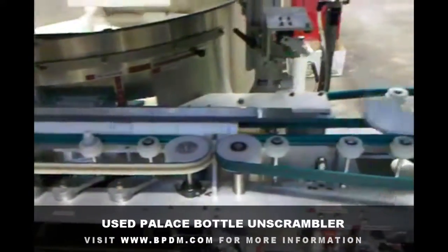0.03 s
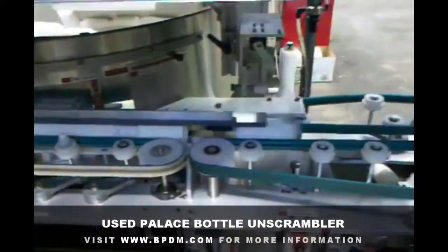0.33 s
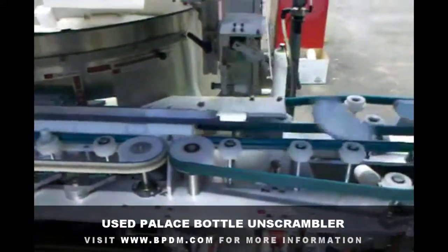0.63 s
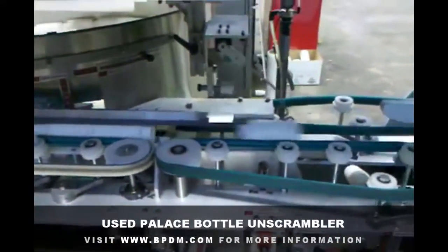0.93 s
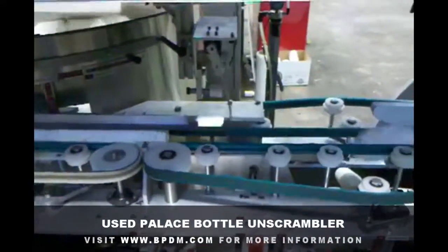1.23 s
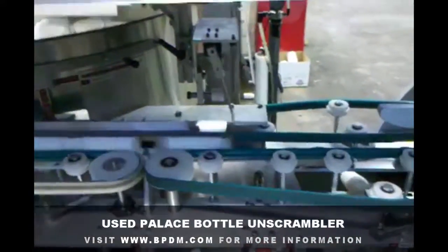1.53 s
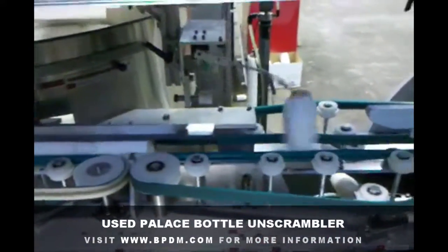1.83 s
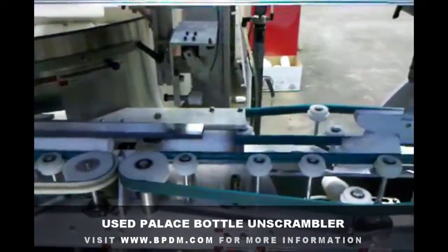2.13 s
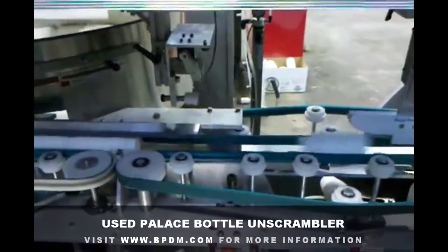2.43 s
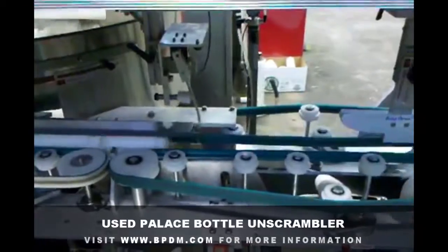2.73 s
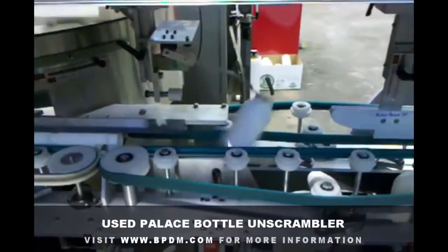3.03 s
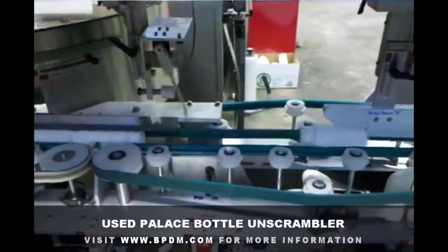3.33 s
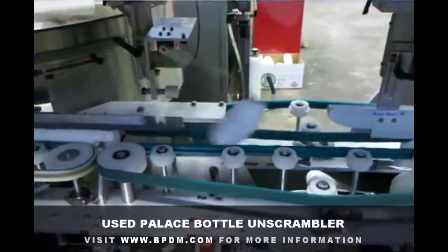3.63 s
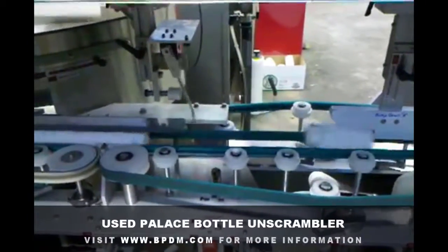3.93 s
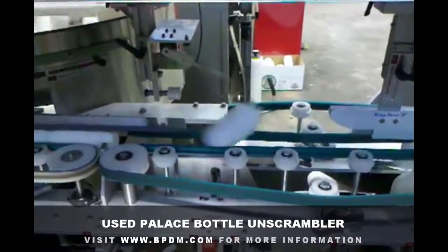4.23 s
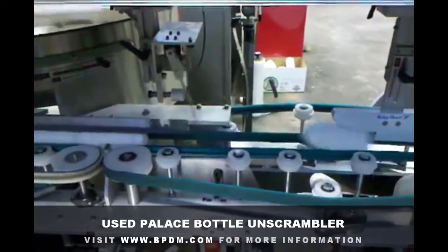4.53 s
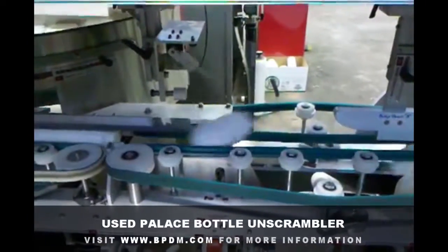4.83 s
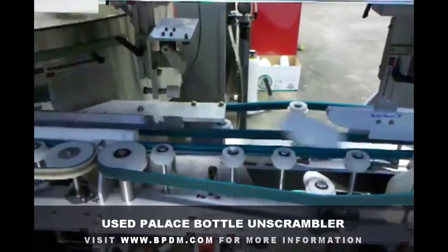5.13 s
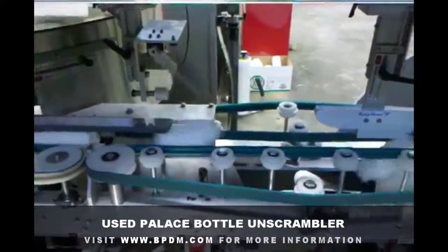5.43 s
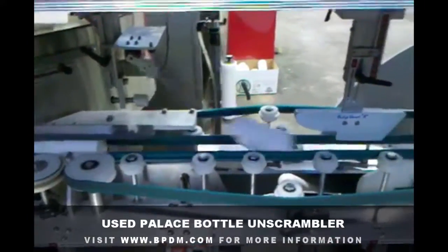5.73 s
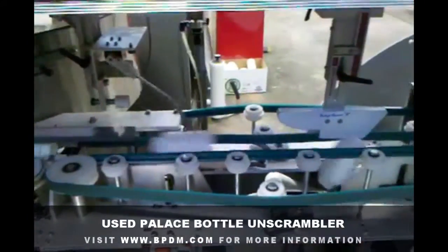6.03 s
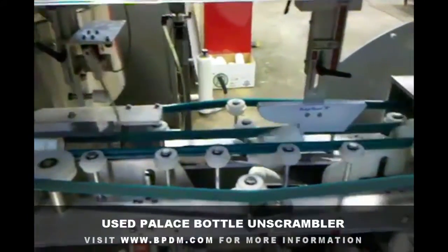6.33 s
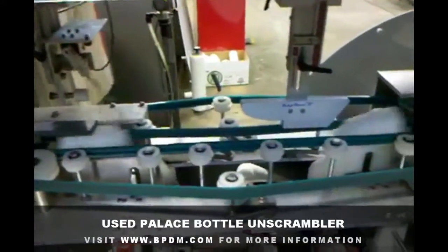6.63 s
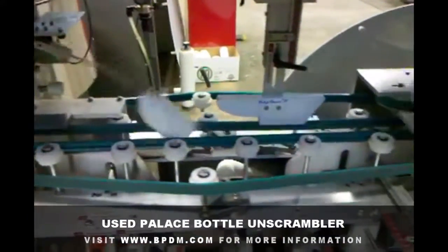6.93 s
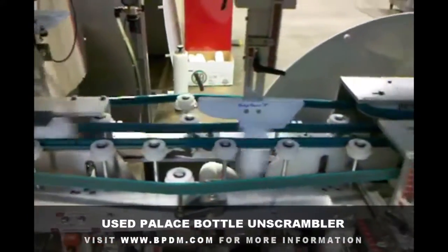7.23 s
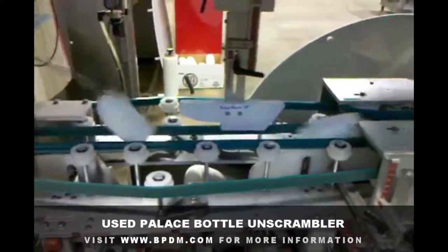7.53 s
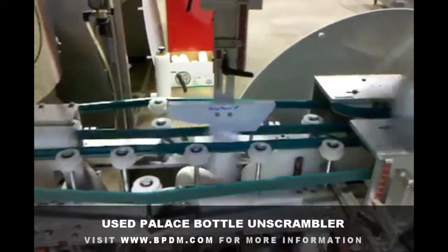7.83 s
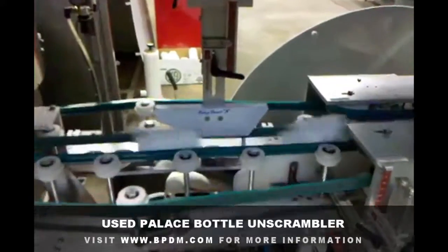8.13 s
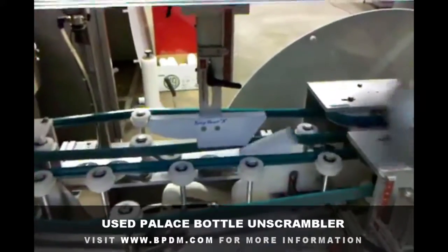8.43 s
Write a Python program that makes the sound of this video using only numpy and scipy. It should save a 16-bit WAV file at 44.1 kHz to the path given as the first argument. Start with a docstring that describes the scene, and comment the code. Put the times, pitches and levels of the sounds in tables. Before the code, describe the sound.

Empty plastic bottles knock and tumble through a factory sorting machine over a steady, whistling air hiss and low rumble.

```python
"""Empty plastic bottles knock and tumble in a bottle unscrambler, a machine that stands them upright.
They slide around its steel bowl and hit a hook and rails: the plastic cracks, the steel clacks,
and the air inside each bottle gives a short hollow note. Air jets hiss with a breathy whistle.
Behind it all, the drive rumbles and the belts rasp.
The listener is close by in a factory hall and moves along the machine."""
import sys
import numpy as np
from scipy import signal
from scipy.fft import rfft, irfft, next_fast_len
from scipy.io import wavfile
from scipy.ndimage import map_coordinates

SR = 44100
rng = np.random.default_rng(int(sys.argv[2]) if len(sys.argv) > 2 else 0)


def waveform_to_disk(signal):
    """Save audio, clipped to [-1, 1], as 16-bit WAV at the path in sys.argv[1]."""
    frames = np.transpose(np.atleast_2d(signal))
    scaled = np.clip(frames, -1, 1) * 32767
    samples = np.round(scaled).astype(np.int16)
    wavfile.write(sys.argv[1], SR, samples)


N = 378365

# Levels in the tables are relative. A ring time (t60) is how long a sound takes to fade by 60 dB.
# How alike the two ears hear a sound. Each row: frequency in Hz, likeness from 0 to 1.
EAR_LIKENESS = [(25, 1), (70, 0.9), (150, 0.99), (350, 0.97), (600, 0.85), (850, 1), (1200, 0.082),
                (2000, 0.42), (5000, 0.13), (12000, 0.0016)]
# The hall's echo. Each row: frequency in Hz, ring time in seconds.
HALL_RING_TIMES = [(150, 0.015), (1000, 0.15), (4000, 0.12), (12000, 0.021)]

# The tone colour of six sounds. Each row: frequency in Hz, level in dB.
DRIVE_COLOUR = [(20, -36), (42, -17), (80, -13.5), (100, -9.5), (120, -7.5), (155, 3), (185, -4),
                (350, -23), (700, 2.5), (2000, -23.5)]  # the rumbling drive
HISS_COLOUR = [(100, -62), (600, -2.5), (2000, -2.5), (3300, -7), (3750, -1), (4150, -2.5), (5400, 1.5),
               (6100, 4.5), (7700, 5), (8600, 4), (9800, 4), (11300, -3), (13000, -1.5), (14000, -1.5)]  # rushing air
THUD_COLOUR = [(40, -50), (90, -19), (150, -2.5), (178, -3.5), (205, 2.5), (260, 0.5), (295, 6.5),
               (420, -7), (510, -18), (900, -25.5)]  # soft bumps in the bowl
CLATTER_COLOUR = [(300, -58), (550, -10), (680, 5), (950, 5), (1250, -8), (1550, -26), (2300, -12),
                  (3200, -14), (6000, -56), (12000, -9)]  # hard bumps in the bowl
TAP_COLOUR = [(250, -27), (550, 10.5), (750, -12), (1150, 5), (2000, -9.5), (5000, -8), (12000, -24)]  # a light tap of plastic on plastic
CRACK_COLOUR = [(30, -13), (120, -5), (400, -9), (1000, -16.5), (1500, -7), (2100, -4), (3000, -5),
                (4000, -6), (4800, -2.5), (5600, -3.5), (8000, -31), (14000, -27)]  # a sharp blow on plastic

# The tones at which four things ring. Each row: pitch in Hz, width in Hz, level in dB.
GUIDE_TONES = [(3700, 150, 1), (3880, 160, 0.5), (4740, 280, -1)]  # the belt guides
NOZZLE_TONES = [(6430, 200, -6.5), (6800, 89, -4.5), (7250, 150, -10.5), (8000, 660, -13.5)]  # air passing the nozzle's edge
HEAP_TONES = [(418.7, 24.4, -9), (694, 41, -12.5), (973, 39, -15)]  # many bottle walls together
RAIL_TONES = [(282, 87, -1.5), (524, 290, -1), (690, 205, 4), (914, 147, 1), (1147, 130, -3),
              (1600, 180, -13)]  # the struck guide rail
# A bottle's ringing wall. Each row: multiple of the wall's pitch, level in dB, ring time in seconds.
WALL_TONES = [(.86, -19, 0.028), (0.999, 6, 0.053), (1.27, -13.5, 0.082)]
# A bottle's dented shoulder. Each row: multiple of the snap's pitch, width in Hz, level in dB.
SHOULDER_TONES = [(1, 170, 2), (1.16, 200, 2), (1.33, 240, -3.5)]

# Belts running over pulleys. Each row: time in seconds, whirr in dB, pulley ring in dB.
BELT_LEVELS = [(0, -27.5, -36), (3, -40, -32), (6, -27, -33), (7.0, -26, -29.5), (8.5, -24, -27)]
# Dull bumps in the machine's frame. Each row: start in seconds, level in dB.
FRAME_THUMPS = [(0.524, -5), (0.843, -11), (1.124, -8), (2.135, -5), (2.449, -12), (3.18, -14), (3.43, -11),
                (6.47, -14), (8.085, -10)]
# How loud the air hisses. Each row: time in seconds, level in dB.
HISS_LEVELS = [(0, -13), (3.8, -13.5), (4.0, -10), (4.5, -14), (5.2, -13.5), (7.9, -13.5), (8.5, -12.5)]
# The whistle, heard from a changing angle. Each row: time in seconds, level in dB, favoured pitch in Hz.
WHISTLE_PATH = [(0.2, -27.5, 6390), (0.95, -20.5, 6720), (1.72, -20, 6790), (2.07, -15, 6670),
                (2.27, -19, 6750), (4.0, -19, 6720), (5.12, -19, 6710), (5.85, -22.5, 6660),
                (6.3, -19.5, 6650), (6.68, -18.5, 6820), (7.03, -16.5, 6750), (7.55, -18, 6640),
                (7.8, -19, 6580), (8.06, -19.5, 6380), (8.58, -16.5, 6620)]
# Heaps sliding down the bowl. Each row: time of full strength in seconds,
# level in dB compared with the steady tumbling, length in seconds.
HEAP_SLIDES = [(0.0, 2, 0.13), (2.683, -0.5, 1), (3.446, 6, 0.18), (3.9, 11.5, 0.13), (4.25, 7.5, 0.065),
               (4.418, 2, 0.53), (6.05, 2, 0.19)]
# Bottle rims catching on steel. Each row: start in seconds, level in dB, pitch in Hz.
RIM_CLINKS = [(0.377, -24, 5340), (0.849, -21.5, 4840), (1.772, -21.5, 5700), (4.129, -25, 4560),
              (5.898, -25.5, 3160)]
# Bottles landing on their side. Each row: start in seconds, wall ring in dB, wall pitch in Hz,
# rail clack in dB.
LANDINGS = [(0.337, -38, 720, -41), (0.776, -34, 700, -33), (0.999, -34, 770, -47), (1.25, -23.5, 700, -33),
            (1.385, -34, 677, -41), (2.043, -42, 650, -31), (2.096, -40, 704, -41), (2.548, -29, 702, -42),
            (3.059, -42, 950, -29), (3.635, -29.5, 670, -40), (4.035, -30, 690, -43),
            (4.245, -33, 680, -46), (5.185, -46, 854, -32), (5.895, -26, 694, -46), (6.32, -37, 695, -37),
            (6.415, -42, 938, -29.5), (6.455, -33, 655, -37), (7.068, -41, 620, -28.5),
            (7.138, -46, 696, -45), (7.718, -44, 950, -26.5), (7.757, -33, 703, -34),
            (8.111, -39, 944, -33)]
# Blows that dent a bottle's shoulder. Each row: start in seconds, level in dB, pitch in Hz.
DENT_SNAPS = [(0.843, -25, 1440), (2.139, -28.5, 1450), (2.666, -40, 1670), (5.921, -27, 1480),
              (7.782, -25.5, 1450)]
# Bottles hitting each other and the rails. Each row: start in seconds, crack in dB, rail clack in dB,
# hollow note in dB, that note's ring time in seconds.
BOTTLE_KNOCKS = [(0.145, -36, -30, -36, 0.14), (0.375, -38, -38, -26, 0.3), (0.839, -35, -31, -25.5, 0.19),
                 (0.994, -31, -35, -24.5, 0.26), (1.023, -41, -33, -28, 0.13), (1.25, -33, -44, -31, 0.24),
                 (1.379, -31.5, -31, -26, 0.18), (1.42, -37, -28, -46, .1), (1.603, -38, -33, -32, 0.16),
                 (1.772, -42, -32, -32, 0.2), (2.137, -27, -35, -24.5, 0.24),
                 (2.272, -33.5, -32, -27, 0.15), (2.605, -44, -28.5, -30, 0.17),
                 (2.664, -29.5, -28.5, -29, 0.073), (3.533, -33, -46, -34, 0.23),
                 (3.64, -47, -38, -28, 0.15), (3.904, -31.5, -24.5, -21.5, 0.11),
                 (3.938, -33, -27, -36, 0.16), (4.018, -37, -41, -32.5, 0.25),
                 (4.252, -33.5, -30.5, -26, 0.13), (4.307, -38, -28, -22.5, 0.15),
                 (4.355, -33, -28, -31, 0.22), (4.761, -30, -27.5, -31.5, 0.098),
                 (5.395, -31.5, -30.5, -32, 0.16), (5.427, -39, -33, -26.5, 0.19),
                 (5.807, -39, -28, -29, 0.082), (5.922, -34, -35, -27.5, 0.13),
                 (6.051, -38, -34, -26.5, 0.27), (6.078, -37, -35, -26, .18),
                 (6.453, -29.5, -39, -29.5, 0.099), (7.297, -31, -34, -26.5, 0.11),
                 (7.783, -28, -43, -22.5, 0.16), (7.911, -32, -34, -25.5, 0.24),
                 (7.947, -46, -52, -28.5, 0.24), (8.312, -33, -29, -28.5, 0.082)]

NECK_HZ = 356  # the note of the air in an empty bottle


def amp(db):
    """Turn decibels into a number to multiply a sound by."""
    return 10 ** (np.asarray(db) / 20)


def unit(x):
    """Scale a sound to an average (rms) level of 1."""
    return x / np.sqrt(np.mean(x ** 2) + 1e-20)


def fade(t, t60):
    """Die away by 60 dB every t60 seconds."""
    return amp(-60 * t / t60)


def along(points, hz):
    """Read between rows of (Hz, value), spaced the way we hear pitch."""
    freqs, values = np.transpose(points)
    return np.interp(np.log(hz + 1), np.log(freqs + 1), values)


def curves(rows):
    """Join timed rows with straight lines: one curve for each column after the time."""
    times, *columns = np.transpose(rows)
    return [np.interp(np.arange(N) / SR, times, column) for column in columns]


def wobble(rate):
    """A smooth curve through `rate` random values a second."""
    return map_coordinates(rng.standard_normal(int(N * rate / SR) + 4), [np.arange(N) * rate / SR])


def noise():
    """Two channels of white noise."""
    return rng.standard_normal((2, N))


def add(track, start, sound):
    """Mix a sound into the track at `start` seconds."""
    part = track[:, max(round(start * SR), 0):][:, :sound.shape[1]]
    part += sound[:, :part.shape[1]]


def filtered(x, response):
    """Turn each frequency of a sound up or down as `response` says."""
    n = x.shape[-1]
    padded = next_fast_len(n + SR // 4)
    return irfft(rfft(x, padded) * response(np.fft.rfftfreq(padded, 1 / SR)), padded)[..., :n]


def colour(spectrum):
    """A filter that follows rows of (Hz, dB)."""
    return lambda hz: amp(along(spectrum, hz))


def body(tones):
    """A filter that rings like an object, at rows of (Hz, width in Hz, dB)."""
    return lambda f: sum((-1) ** k * amp(db) * 1j * f * width / (hz * hz - f * f + 1j * f * width)
                         for k, (hz, width, db) in enumerate(tones))


def heard(pair, response):
    """Filter two unrelated signals into stereo of level 1: bass alike in both ears, treble spread out."""
    def shares(hz):
        angle = np.arccos(np.clip(along(EAR_LIKENESS, hz), -1, 1)) / 2
        return response(hz) * np.array([np.cos(angle), np.sin(angle)])
    mid, side = filtered(pair, shares)
    return unit(np.array([mid + side, mid - side]))


def hall(x):
    """The hall echoes a sound, and each frequency dies away at its own speed."""
    hz, t, spectrum = signal.stft(rng.standard_normal((2, SR // 2)), SR, nperseg=256)
    dying = spectrum * fade(t, along(HALL_RING_TIMES, hz)[:, None])
    tail = signal.istft(dying, SR, nperseg=256)[1]
    tail = heard(tail, np.ones_like) / np.sqrt(tail.shape[1])
    return signal.fftconvolve(x, tail, axes=1)[:, :N]


def drive(rumble_db, pulley_hz):
    """The drive rumbles, the belts rasp in their guides, and a pulley rings as a belt rubs it."""
    whirr_db, ring_db = curves(BELT_LEVELS)
    slip_db = 1.1 * wobble(10) + 1.2 * wobble(45)
    judder_db = 2.5 * wobble(9)
    rumble = amp(rumble_db + judder_db) * heard(noise(), colour(DRIVE_COLOUR))
    rubbing = amp(whirr_db + slip_db) * heard(noise(), body(GUIDE_TONES))
    pulley = amp(ring_db) * heard(noise(), body([(pulley_hz, 70, 0)]))
    return rumble + (rubbing + pulley) * amp([[-.7], [.7]])  # the belts are a little to the right


def thumps(hz, t60):
    """Dull pushes swell and die in the machine's frame."""
    track, t = np.zeros((2, N)), np.arange(SR // 4) / SR
    push = np.sin(2 * np.pi * hz * t) * fade(t, t60) * (1 - np.exp(-t / 0.011)) ** 2
    for start, db in FRAME_THUMPS:
        add(track, start, amp(db) * push[None])
    return track


def panels(x, echo_db, drift_s):
    """Steel panels add short echoes, whose delays change slowly as the listener moves."""
    n, out = np.arange(N), x.copy()
    for side in range(2):
        for delay in rng.uniform(0.001003, .009, size=6):
            path_s = delay + drift_s * np.interp(n / SR, np.arange(10), rng.standard_normal(10))
            out[side] += amp(echo_db) * map_coordinates(x[side], [n - path_s * SR], order=3)
    return unit(out)


def air_jets(whistle_db, middle_hz, pan_db_per_s):
    """Air hisses and whistles over a nozzle's edge. Which tone stands out depends on the angle."""
    angle_db, favoured_hz = curves(WHISTLE_PATH)
    hiss_db, = curves(HISS_LEVELS)
    rush = panels(heard(noise(), colour(HISS_COLOUR)), echo_db=-4.0, drift_s=0.0001195)
    tilt_db = (favoured_hz - middle_hz) / 23.5  # above 0, high tones rise and the low one drops
    whistle = 0
    for hz, width, db in NOZZLE_TONES:
        lean = np.clip((hz - middle_hz) / 400, -1, 1)
        whistle = whistle + amp(db + tilt_db * lean) * heard(noise(), body([(hz, width, 0)]))
    whistle = panels(whistle, echo_db=-16.0, drift_s=0.000097)
    right_db = pan_db_per_s * np.arange(N) / SR  # the nozzle drifts right as the listener moves
    whistle *= amp(np.array([-right_db, right_db]) / 2)
    flutter_db, waver_db = .65 * wobble(16), 1.2 * wobble(12)
    hiss = amp(hiss_db + flutter_db) * rush * amp([[.4], [-.4]])  # a little to the left
    return hiss + amp(angle_db + whistle_db + waver_db) * whistle


def bottle_hum(start_s, length_s, level_db, waver_hz, waver_db):
    """One bottle holds a wavering hollow note, as when air blows over its mouth."""
    rise_s, fall_s = 0.03, 0.027
    t = np.arange(N) / SR - start_s
    held = np.clip(t / rise_s, 0, 1) * np.clip((length_s - t) / fall_s + 1, 0, 1)
    pitch_hz = NECK_HZ + waver_hz * wobble(25.1)
    tone = np.sin(2 * np.pi * np.cumsum(pitch_hz) / SR)
    return held * amp(level_db + waver_db * wobble(22)) * unit(tone)


def collisions(rate, spread_db, t60):
    """Short bursts of noise at random moments and strengths, about `rate` a second."""
    chance, size = rng.random(N), rng.standard_normal(N)
    blows = (chance < rate / SR) * amp(spread_db * np.clip(size, -2, 2))
    power = signal.lfilter([1], [1, -fade(1 / SR, t60) ** 2], blows ** 2)  # each blow dies away
    return np.sqrt(power) * noise()


def surge(rise_s=0.053, settle_s=0.26):
    """The extra dB from sliding heaps: each builds up quickly, runs for a while and settles."""
    t, power = np.arange(N) / SR, 1
    for full_at, db, length in HEAP_SLIDES:
        rising = np.clip((t - full_at) / rise_s + 1, 0, 1)
        settling = np.exp(-np.maximum(t - full_at - length, 0) / settle_s)
        power = power + (amp(db) * rising * settling) ** 2
    return 10 * np.log10(power)


def bowl(thud_db, neck_db, clatter_db, wall_db):
    """Hundreds of bottles tumble in the bowl: dull thuds, hollow necks and clattering walls."""
    surge_db = surge()
    away_db = 0.5 * np.maximum(np.arange(N) / SR - 4.55, 0)  # the listener leaves the bowl at 4.55 s
    soft = collisions(rate=240, spread_db=3, t60=0.069)
    hard = collisions(rate=130, spread_db=1.5, t60=0.096)
    glancing = collisions(rate=80, spread_db=0.5, t60=0.032)
    thuds = amp(thud_db + surge_db) * heard(soft, colour(THUD_COLOUR))
    necks = amp(neck_db + 0.59 * surge_db) * heard(noise(), body([(NECK_HZ, 7, 0)]))
    clatter = amp(clatter_db) * heard(hard, colour(CLATTER_COLOUR))
    walls = amp(wall_db) * heard(glancing, body(HEAP_TONES))
    low = amp(-0.35 * away_db) * (thuds + necks)  # low sounds fade less with distance
    high = amp(0.68 * surge_db - away_db) * (clatter + walls)
    return low + high


def taps(level_db, rate, spread_db):
    """Single bottles tap each other at random moments, harder while a heap is sliding."""
    touches = collisions(rate, spread_db, t60=0.1)
    return amp(level_db + surge()) * heard(touches, colour(TAP_COLOUR))


def chatter(t, span_s, t60):
    """The force of a light bottle bouncing: five quick touches."""
    touches = np.linspace(0, 1, num=5) * span_s * rng.uniform(.7, 1.3, size=5)
    return sum(rng.uniform(0.39, 1) * (t >= at) * fade(np.abs(t - at), t60) for at in touches)


def crackle(force, t, scuff_db):
    """A blow scuffs the plastic and sets off many short tones, new ones for each spot that is hit."""
    hz = np.geomspace(1000, 6000, num=40)[:, None] * rng.uniform(.94, 1.06, size=(40, 1))
    phase = 2 * np.pi * (hz * t + rng.random((2, len(hz), 1)))
    tones = np.sum(np.sin(phase), axis=1) * fade(t, t60=0.055)  # thin plastic hardly rings
    pressed = force * (1 - np.exp(-t / .004))
    rough_force = pressed * rng.standard_normal(len(t))
    ring = signal.fftconvolve(tones, rough_force[None], axes=1)[:, :len(t)]
    scuff = pressed * rng.standard_normal((2, len(t)))
    return unit(filtered(unit(ring) + amp(scuff_db) * unit(scuff), colour(CRACK_COLOUR)))


def clack(t, gap_s, loss_db):
    """A bottle rattles against the rail, whose tones shift with the spot that is hit."""
    spot = rng.uniform(-1, 1, size=(len(RAIL_TONES), 2))
    tones = [(hz * (1 + .07 * detune), width, db + 2 * boost)
             for (hz, width, db), (detune, boost) in zip(RAIL_TONES, spot)]
    touch, blows = np.arange(6), np.zeros((2, len(t)))
    strength = amp(-loss_db * np.abs(touch - 1))  # the second touch is hardest
    for channel in blows:
        times = gap_s * (touch + rng.uniform(.4, 1.2, size=len(touch)))
        channel[(times * SR).astype(int)] = strength * rng.choice([-1, 1], size=len(touch))
    return heard(blows, body(tones))


def wall_ring(wall_hz, t):
    """A bottle's wall flexes in a few tones, whose strengths depend on where it is hit."""
    ratio, db, t60 = np.transpose(WALL_TONES)[:, :, None]
    phase = 2 * np.pi * (wall_hz * ratio * t + rng.random((2, len(WALL_TONES), 1)))
    swell = (1 - np.exp(-t / .0055)) ** 2
    spot_db = 1.5 * rng.standard_normal((len(WALL_TONES), 1))
    tones = amp(db + spot_db) * fade(t, t60) * swell * np.sin(phase)
    return heard(np.sum(tones, axis=1), np.ones_like)


def hoot(t, t60, belly_hz=286):
    """The air in a struck bottle gives a hollow note, and its soft belly thuds underneath."""
    pitch_hz = NECK_HZ * (1 + .012 * rng.standard_normal())
    note = np.sin(2 * np.pi * pitch_hz * t) * fade(t, t60)
    belly = amp(-4) * np.sin(2 * np.pi * belly_hz * t) * fade(t, t60=0.063)
    swell = 1 - np.exp(-t / .006)
    return unit((note + belly) * swell)


def clinks(width_hz, t60):
    """A bottle's hard rim catches on the steel hook or rails with a short, bright tick."""
    track, t = np.zeros((2, N)), np.arange(SR // 8) / SR
    for start, db, hz in RIM_CLINKS:
        scrape = fade(t, t60) * rng.standard_normal((2, len(t)))
        add(track, start, amp(db) * heard(scrape, body([(hz, width_hz, 0)])))
    return track


def landings(wall_db, clack_db, crack_db):
    """A bottle tipped over by the hook lands flat: its wall rings and the rail clacks back."""
    track, t = np.zeros((2, N)), np.arange(SR // 4) / SR
    for start, wall, wall_hz, rail in LANDINGS:
        force = chatter(t, span_s=0.015, t60=0.016)
        contact = clack(t, gap_s=.003, loss_db=2.0) + amp(crack_db) * crackle(force, t, scuff_db=-2.0)
        add(track, start, amp(wall + wall_db) * wall_ring(wall_hz, t) + amp(rail + clack_db) * contact)
    return track


def snaps():
    """A hard blow dents the stiff shoulder of a bottle, which springs back with a snap."""
    track, t = np.zeros((2, N)), np.arange(SR // 4) / SR
    for start, db, hz in DENT_SNAPS:
        flexing = chatter(t, span_s=.018, t60=.022) * rng.standard_normal((2, len(t)))
        shoulder = body([(hz * ratio, width, level) for ratio, width, level in SHOULDER_TONES])
        add(track, start, amp(db) * heard(flexing, shoulder))
    return track


def knocks(clack_db, hollow_db, crack_db):
    """Each blow cracks on the plastic, clacks on the rail and makes the air in the bottle hoot."""
    track, t = np.zeros((2, N)), np.arange(SR // 3) / SR
    lag_s = 0.0046  # the air answers just after the blow
    for start, crack, rail, hollow, t60 in BOTTLE_KNOCKS:
        force = chatter(t, span_s=.023, t60=0.0086) * fade(t, 0.063)  # the bounces die away
        plastic = amp(crack + crack_db) * crackle(force, t, scuff_db=-4.0)
        steel = amp(rail + clack_db) * clack(t, gap_s=.005, loss_db=2)
        add(track, start, plastic + steel)
        add(track, start + lag_s, amp(hollow + hollow_db) * hoot(t, t60)[None])
    return track


def scene():
    """Mix the nearby bottles and their echo with the bowl, the air and the machinery."""
    near = knocks(clack_db=-2.5, hollow_db=-0.4, crack_db=2.2) + snaps()
    near += landings(wall_db=1.9, clack_db=1.4, crack_db=-6) + clinks(width_hz=1300, t60=0.11)
    tumbling = bowl(thud_db=-26.17, neck_db=-32.5, clatter_db=-28.5, wall_db=-30.5)
    tumbling += taps(level_db=-35.0, rate=22, spread_db=-0.5)
    air = air_jets(whistle_db=1.17, middle_hz=6688, pan_db_per_s=0.74)
    air += bottle_hum(start_s=3.47, length_s=0.41, level_db=-27, waver_hz=4.8, waver_db=6)
    echo = amp(-5.5) * hall(near)
    machinery = drive(rumble_db=-28.0, pulley_hz=1480) + thumps(hz=97, t60=0.068)
    return near + echo + tumbling + air + machinery


def record(dry):
    """A small microphone thins the deep bass, rounds off loud peaks and cuts the highest treble."""
    bass_hz, top_hz, ceiling = 75, 14000, .92
    thin = filtered(dry, lambda hz: 1j * hz / (bass_hz + 1j * hz))
    rounded = thin / (1 + np.abs(thin / ceiling) ** 8) ** (1 / 8)
    return filtered(rounded, lambda hz: hz < top_hz)


dry = scene()
out = record(dry)
waveform_to_disk(out)
```